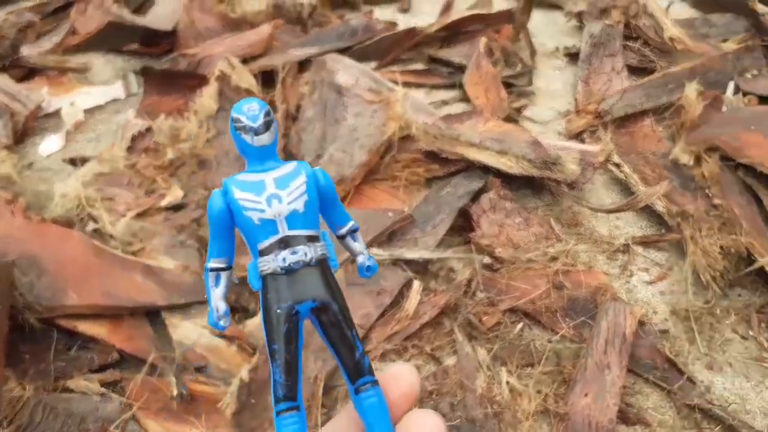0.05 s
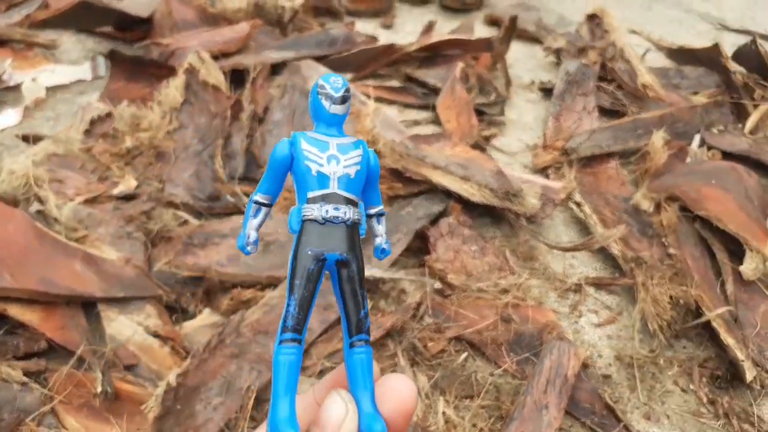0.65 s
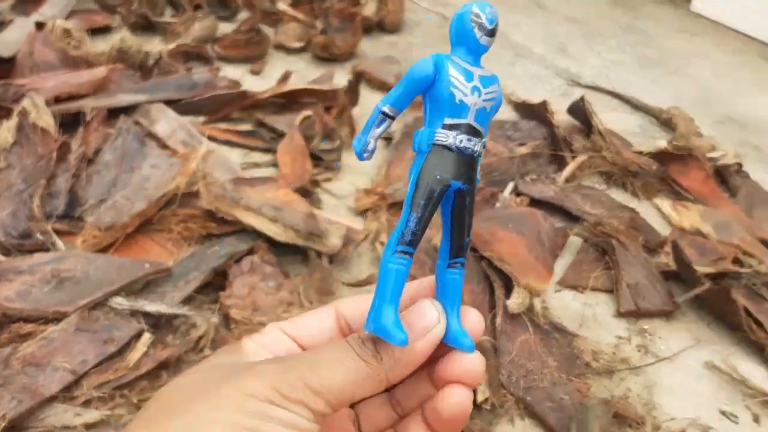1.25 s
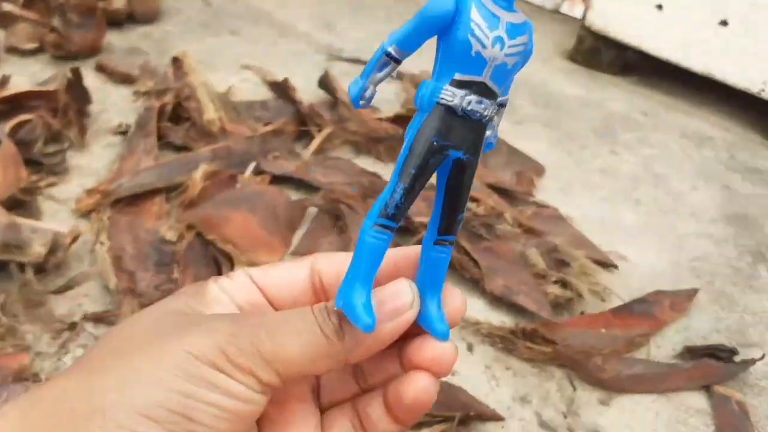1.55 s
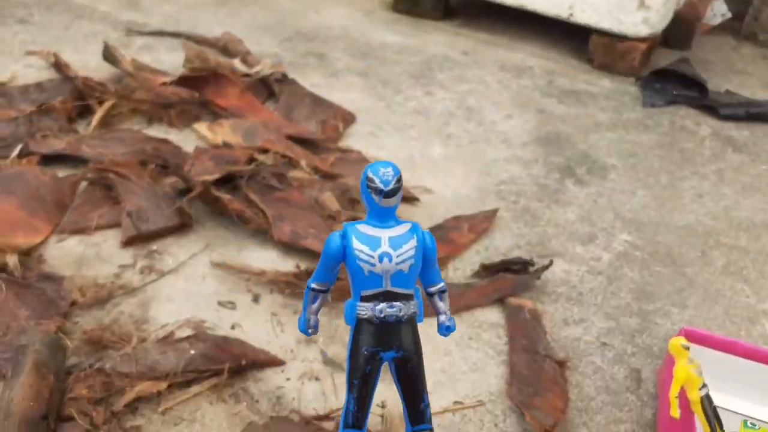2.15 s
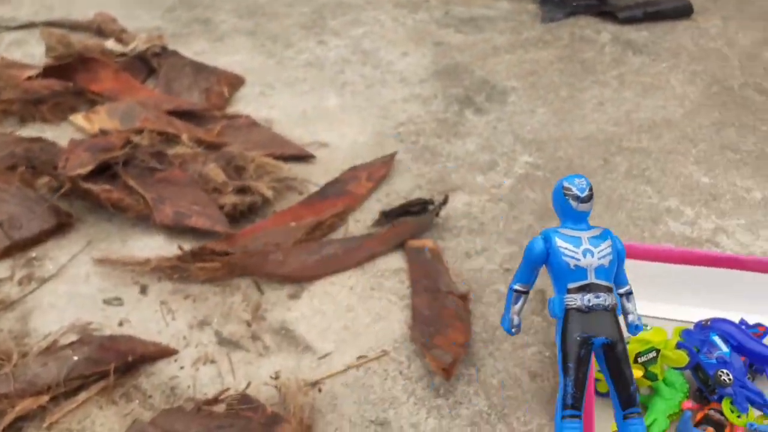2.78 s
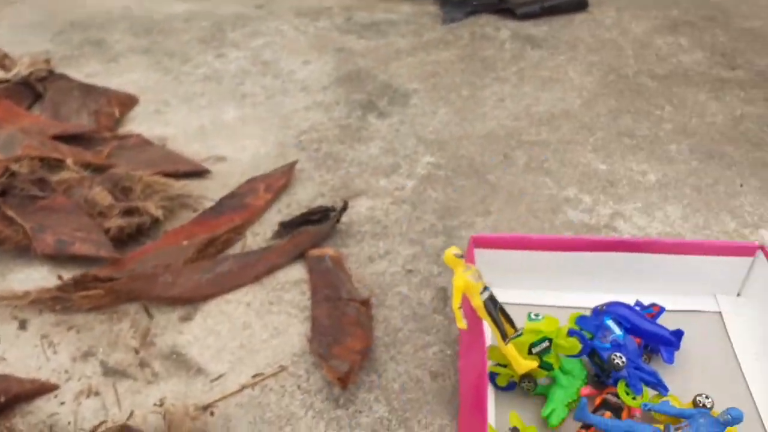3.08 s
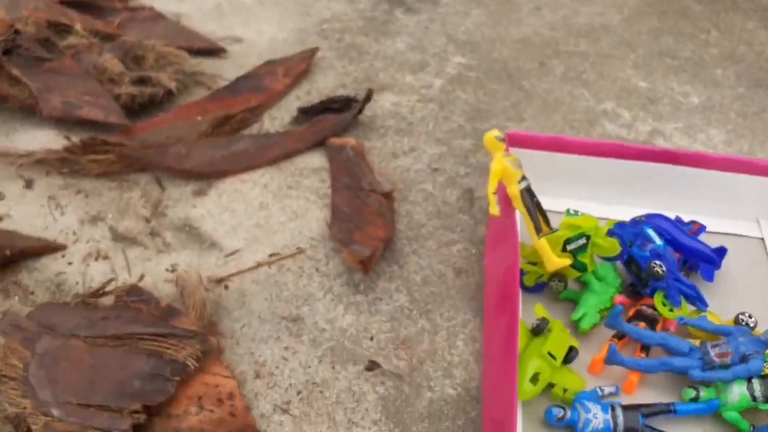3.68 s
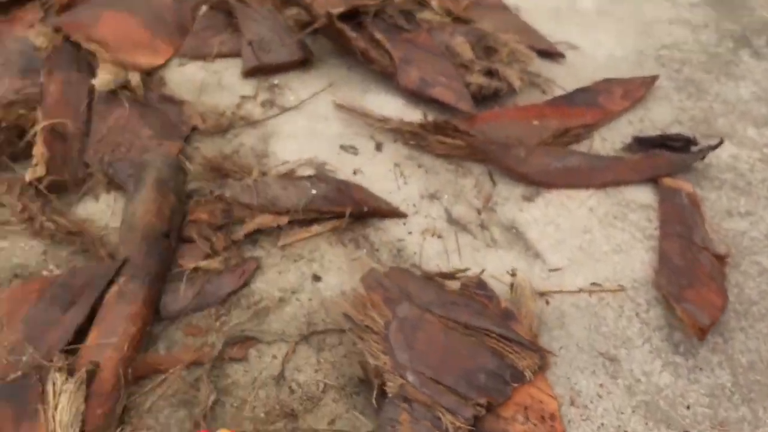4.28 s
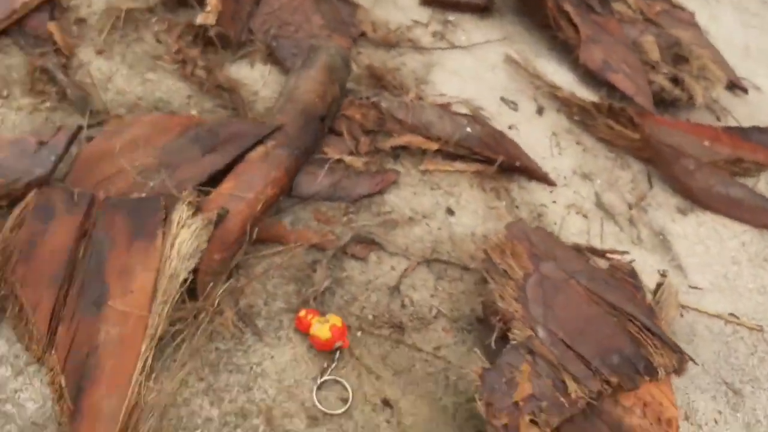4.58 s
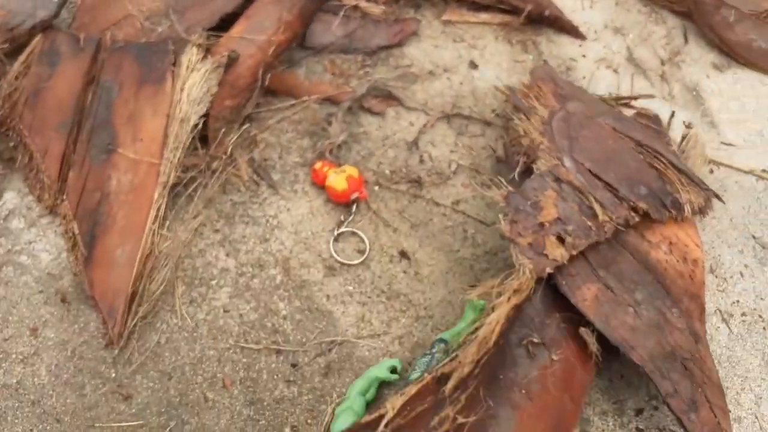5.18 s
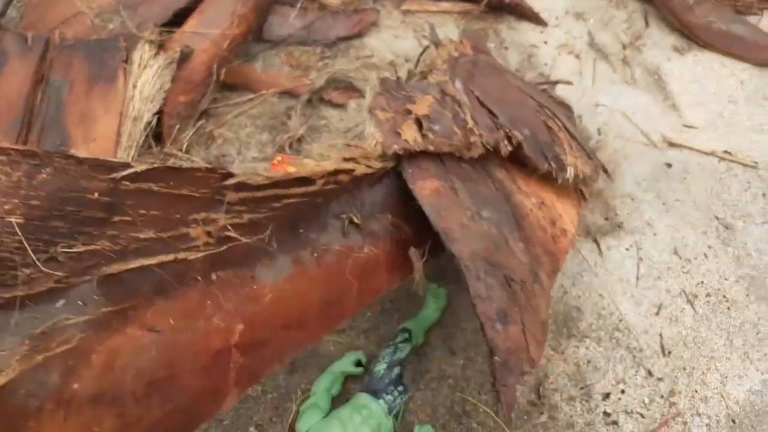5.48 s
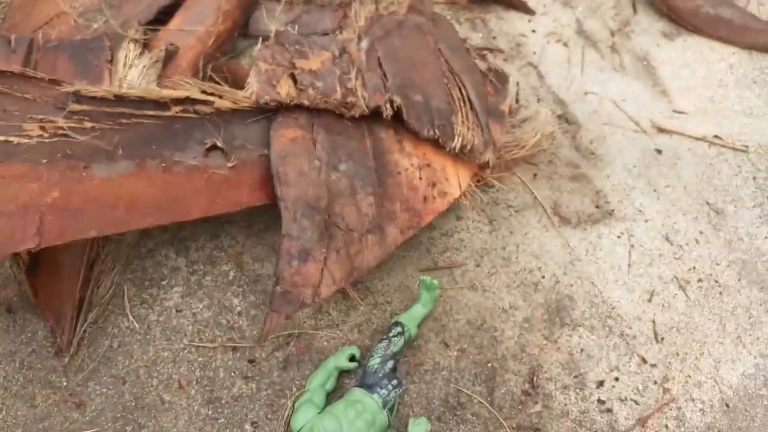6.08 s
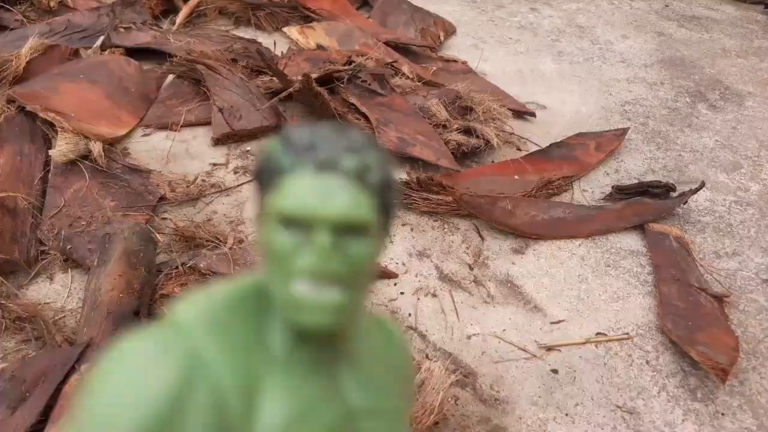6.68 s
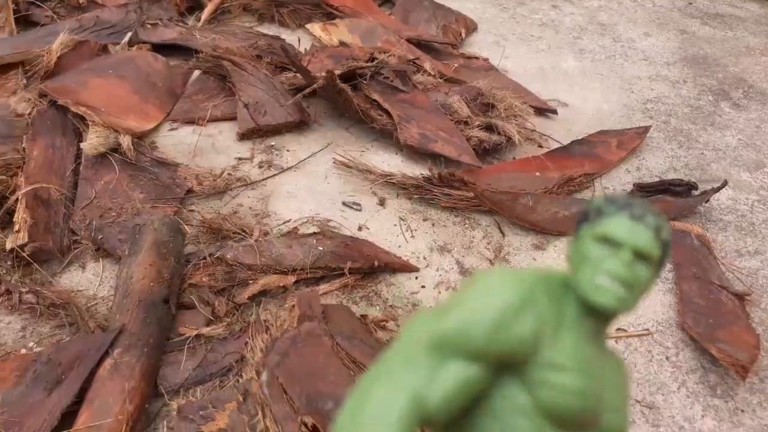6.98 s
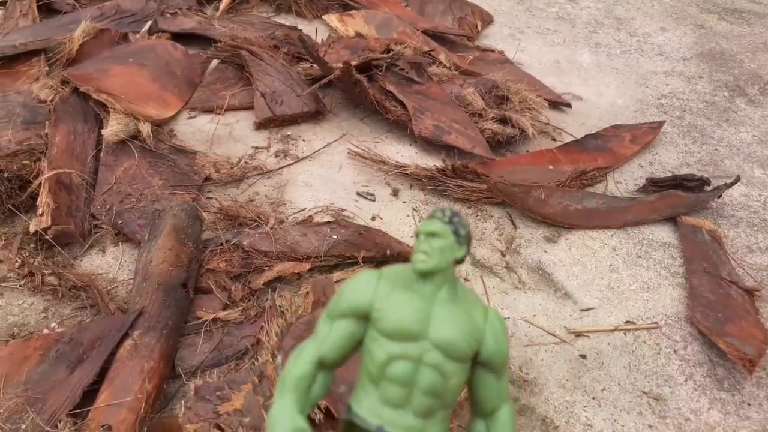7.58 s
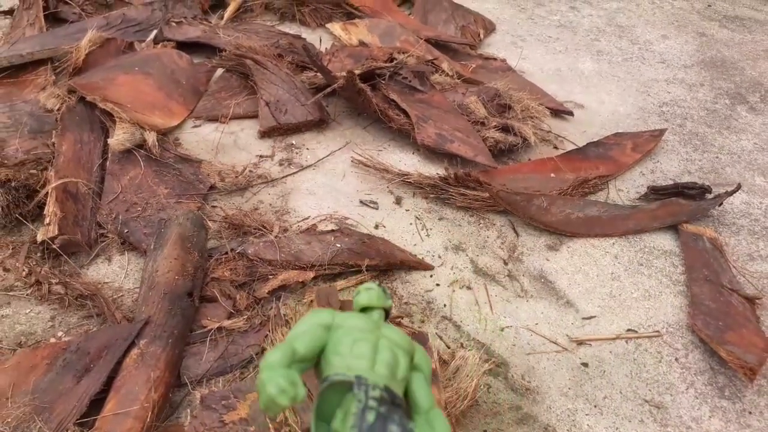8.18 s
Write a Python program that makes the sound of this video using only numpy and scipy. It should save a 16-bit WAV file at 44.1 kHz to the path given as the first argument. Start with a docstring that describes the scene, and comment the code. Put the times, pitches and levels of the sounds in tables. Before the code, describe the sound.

Dry bark crunches underfoot with a few sharp cracks, and birds chirp and trill from across an open yard over faint, distant traffic. The loudest sound comes next, right by the microphone: a plastic toy dropping onto other toys in a cardboard box and rattling to rest. Then a fibrous husk scrapes along concrete in short pushes, with small woody knocks. After a brief dropout come a soft breeze and a single hoarse caw.

```python
"""Dry palm bark crackles underfoot over the hum of far traffic, on a concrete yard heard through a
two-port microphone. Birds chirp, trill and squawk across the yard, echoed by a wall. Close by, a hollow
plastic toy clatters onto others in a cardboard box; then a husk is dragged over the ground, its fibres
slipping and snapping. The sound drops out for a moment, a breeze stirs and one bird caws hoarsely."""
import sys
import numpy as np
from scipy import signal
from scipy.fft import rfft, irfft, next_fast_len
from scipy.io import wavfile

SR = 44100
rng = np.random.default_rng(int(sys.argv[2]) if len(sys.argv) > 2 else 0)


def generate_wav(signal):
    """Clip the signal to [-1, 1] and save it as 16-bit WAV at the path in sys.argv[1]."""
    frames = np.transpose(np.atleast_2d(signal))
    scaled = np.clip(frames, -1, 1) * 32767
    pcm = np.round(scaled).astype(np.int16)
    wavfile.write(sys.argv[1], SR, pcm)


N = 372625
TIME = np.arange(N) / SR
LAG = 4  # samples by which the left port hears a source later

# Woody modes of the husk. Each row: frequency in Hz, level in dB, seconds to fall 60 dB.
HUSK_MODES = [(1750, -9, .007), (3200, -1, .01), (4600, -0.5, 0.0074)]


def amp(db):
    """Decibels to gain."""
    return np.exp(np.asarray(db) * (np.log(10) / 20))


def unit(x):
    """Scales to rms 1."""
    return x / np.sqrt(np.mean(x ** 2) + 1e-20)


def read(points, hz):
    """Reads a table on a log-frequency axis."""
    f, value = np.transpose(points)
    return np.interp(np.log(hz + 1), np.log(f + 1), value)


def level(rows, column=1):
    """Gain over time from one dB column of a curve; silent outside it."""
    rows = np.asarray(rows)
    return amp(np.interp(TIME, rows[:, 0], rows[:, column], left=-150, right=-150))


def add(mix, s, sound):
    """Mixes a sound in at s seconds."""
    part = mix[..., round(s * SR):][..., :sound.shape[-1]]
    part += sound[..., :part.shape[-1]]


def colour(x, points, size=4096):
    """Causal filter with the given spectrum."""
    log_gain = np.log(amp(read(points, abs(np.fft.fftfreq(size, 1 / SR)))))
    taps = np.fft.ifft(np.exp(np.conj(signal.hilbert(log_gain)))).real[:size // 2]
    return signal.oaconvolve(np.atleast_2d(x), taps[None], axes=1)[:, :x.shape[-1]]


def wander(n, hz):
    """Random drift of rms about 1, swinging up to hz times a second."""
    steps = np.arange(n) * 2 * hz / SR
    knots = rng.standard_normal(8192)
    return np.interp(steps, np.arange(len(knots)), knots) * np.sqrt(3 / 2)


def resonate(x, hz, width):
    """One resonance of gain 1."""
    b, a = signal.iirpeak(min(hz, SR / 2.2), hz / width, SR)
    return signal.lfilter(b, a, x)


def steer(x, hz, width, order=3):
    """A steep resonance whose centre follows the curve hz."""
    turn = np.exp(2j * np.pi * np.cumsum(hz) / SR)
    pole = np.exp(-np.pi * width / SR)
    x = x / turn
    for _ in range(order):
        x = signal.lfilter([1 - pole], [1, -pole], x)
    return 2 * (turn * x).real


def ring(modes, t, spread):
    """Dying modes; each blow strikes another spot, so weights and pitches vary."""
    hz, db, t60 = np.transpose(modes)[:, :, None]
    weight, detune = rng.standard_normal((2, len(modes), 1))
    decay = np.sign(weight) * amp(db + 2 * weight - 60 * t / t60)
    return (decay * np.sin(2 * np.pi * hz * (1 + spread * detune) * t)).sum(0)


def stroke(start, length, rise, sag_db, release_s):
    """Gain of one movement: it builds over a share of its length, sags, then dies away."""
    gain, t = np.zeros(N), np.arange(0, length + 10 * release_s, 1 / SR)
    attack = np.sin(np.pi / 2 * np.clip(t / (rise * length), 0, 1)) ** 2
    sag = amp(sag_db * np.clip(t / length, 0, 1))
    release = np.exp(-np.maximum(t - length, 0) / release_s)
    add(gain, start, attack * sag * release)
    return gain


def place(x, left_db, wet_db, near_db):
    """Puts a source in the yard: direct sound, scatter from things close by, and a short tail."""
    # The yard's reverberation. Each row: frequency in Hz, seconds to fall 60 dB.
    yard_decay = [(150, 0.28), (3000, 0.45), (15000, 0.22)]
    t = np.arange(SR // 2) / SR
    taps = rng.standard_normal((2, len(t))) * (rng.random((2, len(t))) < .1)
    hz, at, spectrum = signal.stft(taps * (t > .006), SR, nperseg=256)
    decay = amp(-60 * at / read(yard_decay, hz)[:, None])
    tail = signal.istft(spectrum * decay, SR, nperseg=256)[1][:, :len(t)]
    near = taps * np.exp(-t / 0.0025) * (t > .0004)
    paths = (amp(wet_db) * unit(tail) + amp(near_db) * unit(near)) / np.sqrt(len(t))
    paths[0, LAG] += 1  # direct sound
    paths[1, 0] += 1
    return signal.oaconvolve(x[None], paths, axes=1)[:, :N] * amp([[left_db], [0]])


def diffuse(points):
    """Noise from all around: alike at both ports in the bass, less so in the treble."""
    # Each row: frequency in Hz, correlation between the ports.
    likeness = [(30, 0.24), (70, 1), (300, 0.86), (600, 0.065), (12000, 0.3)]
    size = next_fast_len(N)
    hz = np.fft.rfftfreq(size, 1 / SR)
    left, other = rfft(rng.standard_normal((2, size)))
    same = np.clip(read(likeness, hz), 0, 1)
    right = same * left + np.sqrt(1 - same ** 2) * other
    return unit(irfft(np.array([left, right]) * amp(read(points, hz)), size)[:, :N])


def neighbourhood():
    """Far traffic, an idling engine, a thin hiss of air, and a light breeze at the end."""
    # Spectra of road rumble, tyre wash and air. Each row: frequency in Hz, level in dB.
    rumble_tone = [(20, -39.5), (35, -19.5), (55, -8.5), (80, 5), (125, 0.5), (190, -2.5), (330, -8.5),
                   (450, -12), (700, -37.5), (3000, -72)]
    tyre_tone = [(250, -6), (500, 5), (700, 4), (1200, 1.5), (2200, -8), (4500, -42)]
    air_tone = [(1000, -2), (2000, 4), (4000, 3.5), (7000, 0), (10000, -5.5), (15000, -11.5)]
    # The background hum's level drifts, sinking after the loud clatter and slowly recovering.
    # Each row: time in seconds, level in dB.
    background_level = [(0, -46), (1.1, -44.5), (1.9, -47), (2.7, -46.5), (4.2, -50.5), (6.9, -45.5),
                        (8.45, -46)]
    # Each row: time in seconds, level of the broad hiss in dB, level of its top treble in dB.
    hiss_levels = [(0, -55, -65), (3.1, -58, -68), (3.55, -63, -69.5), (4.75, -65.5, -72), (6.4, -58, -72),
                   (7, -58.5, -62.5), (8.45, -56, -62)]
    # Each row: start in seconds, length in seconds, level in dB.
    puffs = [(6.893, 0.32, -49), (8.14, 0.34, -47)]
    # Each row: frequency in Hz, level against the traffic in dB.
    engine_tones = [(73, -12), (93, -6), (193, -14.5)]
    rumble = diffuse(rumble_tone) * amp(wander(N, 9))
    tyres = diffuse(tyre_tone) * amp(-8.5 + wander(N, 15))
    hiss = diffuse(air_tone) * level(hiss_levels)
    hiss += diffuse([(5000, -32), (10500, -2), (15000, -8.5)]) * level(hiss_levels, column=2)
    gusts = sum(amp(db) * stroke(s, length, rise=0.23, sag_db=0, release_s=0.088)
                for s, length, db in puffs)
    breeze = diffuse([(20, -14), (55, 18), (400, -38)]) * gusts * amp(2 * wander(N, 9.1))
    engine = np.zeros(N)
    for hz, db in engine_tones:
        gain = amp(db + 2 * wander(N, 2.6))
        pitch = hz * (1 + 0.0205 * wander(N, 4))
        engine += gain * np.sin(2 * np.pi * np.cumsum(pitch) / SR)
    hiss *= amp([[-4], [0]]) * amp(.5 * wander(N, 7))
    return (rumble + tyres + engine) * level(background_level) + hiss + breeze


def handling():
    """Soft, dull knocks of handling, the same at both ports."""
    # Each row: start in seconds, level in dB.
    knocks = [(.05, -46), (1.047, -43.5), (2.48, -44.5), (8.211, -50)]
    out, t = np.zeros(N), np.arange(SR // 5) / SR
    for s, db in knocks:
        push = unit(resonate(resonate(rng.standard_normal(len(t)), 310, 150), 310, 150))
        add(out, s, amp(db) * push * t / 0.012 * np.exp(1 - t / 0.015))
    return out


def friction(per_s, spread_db, smooth=.5, bands=12):
    """Countless tiny slips, each a tick of a few cycles from its own spot, over a smooth rub."""
    out, n = np.zeros((2, N)), int(per_s * N / SR / bands)
    for hz in np.geomspace(900, 15000, bands):
        where, chance, side = rng.random((n, 3)).T
        size = amp(spread_db * np.minimum(-np.log(1 - chance), 4.5)) * (-1) ** np.arange(n)
        right_at = (where * N).astype(int)
        left_at = (right_at + (side * 2 * LAG).astype(int)) % N
        clicks = np.array([np.bincount(at, size, N) for at in (left_at, right_at)])
        out += resonate(clicks, hz, hz * 1.46)
    return unit(unit(out) + smooth * rng.standard_normal((2, N)))


def bark():
    """Bark crunches underfoot, then a husk scrapes the concrete; fibres fizz under each uneven stroke."""
    # Spectra of crunch, scrape and fibres. Each row: frequency in Hz, level in dB.
    crunch_tone = [(300, 3), (800, -2.5), (1600, -9.5), (3600, 2), (5500, -2), (7500, -24), (10000, -4.5)]
    scrape_tone = [(300, -37), (700, 2), (1300, -6.5), (2100, -1.5), (3200, -1), (7300, -4), (9500, -13)]
    fizz_tone = [(3000, -13), (7300, -1), (10000, -0.5), (15500, -2)]
    # Weight presses on the bark; pushes slide the husk.
    # Each row: start in seconds, length in seconds, crunch or scrape in dB, fizz in dB.
    treads = [(0.09, 0.46, -55.5, -60), (0.85, 0.16, -36.5, -43), (1.033, 0.14, -48, -55)]
    pushes = [(3.925, 0.27, -47.5, -51.5), (4.326, 0.21, -57, -57), (4.918, 0.032, -56, -59),
              (4.976, 0.31, -51, -55.5), (5.115, 0.093, -43, -46.5), (5.251, 0.2, -44.5, -51),
              (5.437, 0.22, -47.5, -57), (5.644, 0.11, -46, -45.5), (5.744, 0.096, -50.5, -49.5),
              (5.87, 0.13, -56, -53.5), (5.985, 0.042, -47, -47.5), (6.09, 0.14, -45.5, -46.5)]
    # The sheet's resonance moves as it bends. Each row: time in seconds, frequency in Hz.
    bending = [(4.1, 2300), (5.35, 1690), (5.6, 3200), (6.2, 2600)]
    # The husk moves toward the left port. Each row: time in seconds, level there in dB.
    left_levels = [(5.5, -2), (5.8, 2)]
    rub = friction(per_s=6000, spread_db=3.3)
    judder = amp(1.7 * wander(N, 45))
    crunch, scrape = (unit(colour(rub * judder, tone)) for tone in (crunch_tone, scrape_tone))
    fibres = unit(colour(np.roll(rub, SR, axis=1) * judder, fizz_tone))
    sheet = unit(steer(rub[:, ::-1], np.interp(TIME, *np.transpose(bending)), width=900))
    scrape = unit(scrape + amp(-5) * splinters() + amp(-12) * sheet)
    out = np.zeros((2, N))
    for s, length, db, fizz_db in treads:
        weight = stroke(s, length, rise=0.27, sag_db=-3, release_s=0.02)
        out += weight * (amp(db) * crunch + amp(fizz_db) * fibres)
    for s, length, db, fizz_db in pushes:
        push = stroke(s, length, rise=0.6, sag_db=-1, release_s=0.068)
        out += push * (amp(db) * scrape + amp(fizz_db) * fibres)
    out[0] *= amp(np.interp(TIME, *np.transpose(left_levels)))
    return out


def snaps():
    """A stiff fibre breaks with a short crack; the husk's edge snags and lets go with a woody knock."""
    # Each row: start in seconds, level in dB, pitch in Hz.
    breaks = [(0.1116, -30, 7500), (0.2635, -29, 7500), (0.341, -23, 8000), (0.4974, -31, 9000),
              (.903, -18, 7000), (.917, -20, 7000), (.9907, -12.5, 3900), (1.0053, -23, 4500),
              (1.073, -31, 5000), (5.8301, -21.5, 3000), (5.9093, -24, 9100), (6.0075, -25, 8000)]
    # Each row: start in seconds, level in dB.
    snags = [(5.181, -25), (5.364, -27), (5.406, -27), (5.438, -25), (5.531, -27), (5.642, -29),
             (5.7837, -24), (5.798, -29)]
    out, t = np.zeros(N), np.arange(SR // 40) / SR
    for s, db, hz in breaks:
        crack = rng.standard_normal(len(t)) * (np.exp(-t / 0.00039) + 0.1 * np.exp(-t / 0.0026))
        snap = resonate(crack, hz, hz * .5) + 0.39 * crack
        add(out, s, amp(db) * snap / abs(snap).max())
    for s, db in snags:
        knock = ring(HUSK_MODES, t, spread=0.062)
        add(out, s, amp(db) * knock / abs(knock).max())
    return place(out, left_db=-2, wet_db=-7.5, near_db=-5.5)


def far_calls():
    """Distant birds, smeared by many reflections into soft bands of sound that sink in pitch."""
    # Each row: start in seconds, length in seconds, first and last pitch in Hz, level in dB.
    calls = [(.15, .55, 3000, 2750, -63), (2.26, .13, 3200, 2500, -57), (2.52, .45, 1450, 1050, -60),
             (8.1, .22, 820, 780, -59)]
    out = np.zeros(N)
    for s, length, start_hz, end_hz, db in calls:
        n = int(length * SR)
        call = unit(steer(rng.standard_normal(n), np.linspace(start_hz, end_hz, n), .25 * start_hz))
        add(out, s, amp(db + 2 * wander(n, 25)) * call * signal.windows.tukey(n, .5))
    return out


def glide(start_hz, end_hz, length, settle=1.8):
    """Pitch that moves quickly at first, then settles."""
    progress = np.arange(int(length * SR)) / (length * SR)
    return start_hz + (end_hz - start_hz) * (1 - np.exp(-settle * progress)) / (1 - np.exp(-settle))


def whistle(hz, warble, overtone_db, taper):
    """A bird's note on a pitch curve: a trembling sine whose overtones pass a resonance of the beak."""
    n = len(hz)
    phase = 2 * np.pi * np.cumsum(hz * (1 + warble * wander(n, 599.5))) / SR
    overtones = resonate(np.sin(2 * phase) + .35 * np.sin(3 * phase), 7900, 2400)
    tone = np.sin(phase) + amp(overtone_db) * overtones
    return unit(tone * amp(2 * wander(n, 112.8)) * signal.windows.tukey(n, taper))


def squawk(top_hz, depth):
    """A trill of short arches that climbs and turns hoarse, then a slur down; rasp rings in the beak."""
    # Each row: resonance in Hz, level in dB.
    beak_modes = [(3600, -10), (5500, -18), (8000, -15), (12000, -25)]
    trill_s, arches_per_s, climb = .074, 56, .17
    t = np.arange(int(trill_s * SR)) / SR
    swell = np.sin(np.pi * .65 * t / trill_s)
    arches = np.cumsum(arches_per_s * (1 + .1 * wander(len(t), 40))) / SR
    dip = abs(np.cos(np.pi * arches)) ** 3
    trill = top_hz * (1 - climb * (1 - swell)) * (1 - depth * swell * dip)
    slur = glide(3430, 1912, length=.042)
    effort = amp(np.r_[-5 * dip - 3 * (1 - swell), np.linspace(2, -4.5, len(slur))])
    hoarse = np.r_[swell, np.linspace(1, 0, len(slur))]
    voice = whistle(np.r_[trill, slur], warble=.035, overtone_db=-17, taper=.1)
    rasp = sum(amp(db) * unit(steer(rng.standard_normal(len(voice)), np.full(len(voice), hz), 1600))
               for hz, db in beak_modes)
    return unit(effort * (voice + hoarse * rasp))


def birds():
    """Far calls, then chirps, squawks and thin whistles from across the yard, echoed by a wall."""
    # Each row: start in seconds, length in seconds, first and last pitch in Hz, level in dB.
    chirps = [(0.68, 0.075, 2650, 2290, -52.5), (0.898, 0.081, 3660, 3780, -45),
              (.992, 0.032, 3236, 2103, -44), (1.111, 0.04, 3520, 1900, -53),
              (1.266, 0.088, 3450, 2480, -43), (1.699, 0.025, 3570, 2820, -50)]
    thin_whistles = [(3.835, .115, 2630, 2650, -52), (3.975, 0.1, 2640, 2620, -54),
                     (7.505, .27, 5120, 4650, -66)]
    # Each row: start of the trill in seconds, top pitch in Hz, depth as a share of pitch, level in dB.
    squawks = [(1.529, 3947, .26, -37.5), (2.011, 4135, .38, -38.5)]
    # Each row: delay in seconds, level in dB.
    wall_echo = [(.016, -6.5)]
    lead_s, lead_hz = 0.04, 2850  # soft note ahead of each squawk
    out = far_calls()
    for s, length, start_hz, end_hz, db in chirps:
        pitch = glide(start_hz, end_hz, length)
        add(out, s, amp(db) * whistle(pitch, warble=.012, overtone_db=-15, taper=.5))
    for s, length, start_hz, end_hz, db in thin_whistles:
        pitch = np.linspace(start_hz, end_hz, int(length * SR))
        add(out, s, amp(db) * whistle(pitch, warble=.004, overtone_db=-20, taper=1))
    for s, top_hz, depth, db in squawks:
        lead = whistle(glide(lead_hz, .87 * lead_hz, lead_s), warble=.06, overtone_db=-20, taper=.5)
        add(out, s - lead_s, amp(db - 10) * lead)
        add(out, s, amp(db) * squawk(top_hz, depth))
    echoed = out.copy()
    for delay, db in wall_echo:
        add(echoed, delay, amp(db) * out)
    return place(echoed, left_db=-2, wet_db=-10, near_db=-10)


def toy():
    """Close by, hollow plastic strikes plastic, the box floor thuds, and loose limbs slide in between."""
    # The toy lands, topples and settles.
    # Each row: start in seconds, level in dB, brightest frequency in Hz, contact chatter in seconds.
    clacks = [(3.1256, -0.5, 2270, 0.00031), (3.131, -0.5, 3200, 0.0021), (3.1395, -11, 3000, .001),
              (3.145, -6.5, 5500, .0016), (3.154, -9, 3900, 0.0023), (3.175, -4, 2950, 0.00081),
              (3.2016, -22, 4000, .0005), (3.2259, -16.5, 2700, 0.00026), (3.279, -16, 4600, 0.0029),
              (3.3492, -20, 4520, 0.0023), (3.3645, -13, 3200, 0.0005), (3.374, -21, 5000, 0.0035),
              (3.3783, -5, 2750, 0.0003), (3.3919, -4, 5560, 0.0019), (3.3936, -4, 3400, 0.0011),
              (3.411, -11.5, 3690, .001), (3.414, -10.5, 3010, 0.00068), (3.4425, -26.5, 3000, .001),
              (3.451, -22, 2560, 0.0019)]
    # Spectrum of a contact. Each row: frequency in Hz, level in dB.
    clack_tone = [(40, -34.5), (200, -7.5), (800, -5.5), (2000, -2.5), (3200, 0), (6000, -11),
                  (10000, -12.5), (15000, -20)]
    # Each row: frequency in Hz, level in dB, seconds to fall 60 dB.
    plastic_modes = [(1667, -3, 0.037), (2126, -6.5, 0.037), (2480, -2.5, 0.01), (2950, 6.5, 0.0089),
                     (3650, -4, 0.011), (4370, -6, 0.0077), (6150, -6.5, 0.016)]
    box_modes = [(161.4, -4.5, 0.044), (262.6, -3.5, 0.041), (443, -3, 0.03), (746, 2.5, 0.016)]
    # Its full weight meets the box floor. Each row: start in seconds, level in dB.
    landings = [(3.1252, -20), (3.1383, -20)]
    # Each row: start in seconds, length in seconds, level in dB.
    limb_slides = [(3.13, 0.064, -29.5), (3.237, 0.092, -41), (3.386, 0.036, -27.5), (3.446, 0.02, -41.5)]
    clatter, thuds, t = np.zeros(N), np.zeros(N), np.arange(SR // 8) / SR
    for s, db, hz, chatter_s in clacks:
        contact = np.exp(-(t / chatter_s) ** 2) + 0.22 * np.exp(-t / 0.0087)
        crack = colour(4 * (t == 0) + rng.standard_normal(len(t)) * contact, clack_tone)[0]
        blow = unit(crack) + .22 * unit(ring(plastic_modes, t, spread=.03))
        blow = resonate(blow, hz, hz * 0.65) + 0.29 * amp(db / 2) * blow  # harder blows are broader
        add(clatter, s, amp(db) * blow / abs(blow).max())
    shakes = [(s, db - 28.5) for s, db, *_ in clacks]  # every clack shakes the box a little
    for s, db in landings + shakes:
        thud = ring(box_modes, t, spread=0.045) * (1 - np.exp(-t / 0.0013))
        add(thuds, s, amp(db) * thud / abs(thud).max())
    rub = colour(friction(per_s=9500, spread_db=3.5), clack_tone)
    sliding = sum(amp(db) * stroke(s, length, rise=0.3, sag_db=-6, release_s=0.013)
                  for s, length, db in limb_slides)
    rattle = sliding * unit(.5 * resonate(rub, 3100, 1800) + rub) * amp([[-2], [0]])
    return (rattle + place(clatter, left_db=-5.5, wet_db=-37, near_db=-6.5)
            + place(thuds, left_db=2.5, wet_db=-6.5, near_db=-9))


def splinters(per_s=130):
    """Stiff strips catch and spring free at random, each a dry tick in the modes of the husk."""
    out, t = np.zeros((2, N)), np.arange(SR // 100) / SR
    for where, chance, side in rng.random((int(per_s * N / SR), 3)):
        tick = amp(4 * min(-np.log(1 - chance), 2)) * ring(HUSK_MODES, t, spread=.1)
        add(out[0], where * N / SR + side * 2 * LAG / SR, tick)
        add(out[1], where * N / SR, tick)
    return unit(out)


def caw():
    """Jittery pulses and rasp through a throat whose resonances rise and sink with the beak's opening."""
    # The throat with the beak wide open. Each row: resonance in Hz, width in Hz, level in dB.
    throat = [(1435, 190, -13), (1610, 92, -3), (2010, 340, 0)]
    start_s, length_s, level_db, top_hz, arch = 7.46, .31, -41.5, 201, .15
    shut = 0.895  # share of the open throat's frequencies
    t = np.arange(0, length_s, 1 / SR)
    effort = np.sin(np.pi * (t / length_s) ** 0.98)
    opening = np.sin(np.pi * (t / length_s) ** .62)
    pitch = top_hz * (1 - arch * (1 - opening)) * (1 + 0.02 * wander(len(t), 90))
    pulses = unit(np.gradient(np.floor(np.cumsum(pitch) / SR)))
    drive = pulses + 1.1 * rng.standard_normal(len(t))
    beak = shut + (1 - shut) * opening
    call = sum(amp(db) * steer(drive, hz * beak, width) for hz, width, db in throat)
    out = np.zeros(N)
    add(out, start_s, amp(level_db) * effort ** .5 * unit(call))
    return place(out, left_db=0, wet_db=-12, near_db=-9)


def scene():
    """The yard as it reaches the microphone."""
    return bark() + snaps() + toy() + birds() + caw() + handling() + neighbourhood()


def record(dry):
    """Each port colours the sound, the left shaded and notched; a brief dropout; clipping; a band limit."""
    # Each row: frequency in Hz, left port's gain in dB, right port's gain in dB.
    port_tone = [(59.9, -8, -5), (606, -7, -5.5), (1910, -4.5, -0.5), (3270, -4.5, 1), (5940, -3, 2),
                 (7630, -17.5, 4.5), (8670, -48, -4), (8910, -18, 3), (15400, -2, 2.5)]
    mute_s, return_s, fade_in_s, edge_hz = 6.705, 6.79, 0.11, 15700
    ports = np.array(port_tone)
    heard = np.vstack([colour(dry[0], ports[:, :2]), colour(dry[1], ports[:, ::2])])
    fade_in = np.clip((TIME - return_s) / fade_in_s, 0, 1) ** 2
    dropout = np.where(TIME < mute_s, 1, fade_in + amp(-80))
    heard = np.clip(heard * dropout, -.85, .85)
    lowpass = signal.firwin(301, edge_hz, window=("kaiser", 9), fs=SR)
    return signal.oaconvolve(heard, lowpass[None], "same")


dry = scene()
out = record(dry)
generate_wav(out)
```